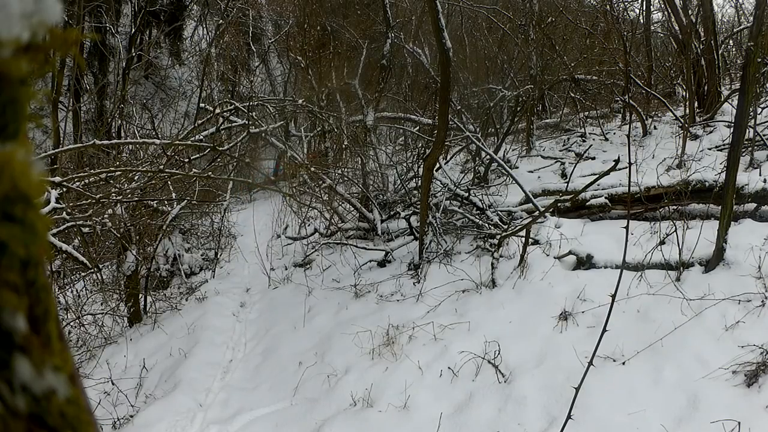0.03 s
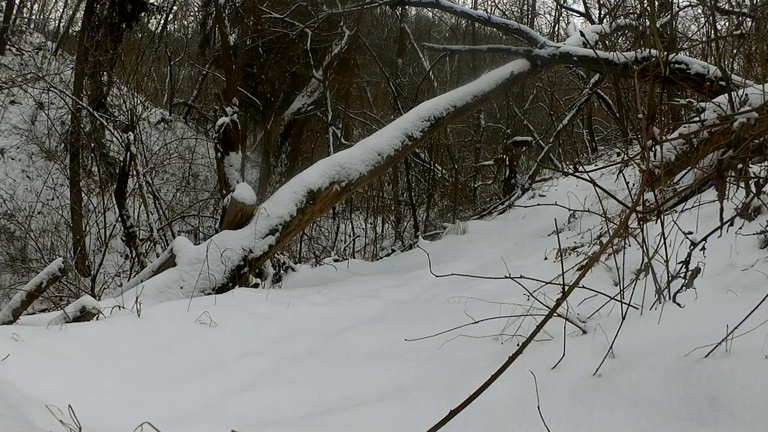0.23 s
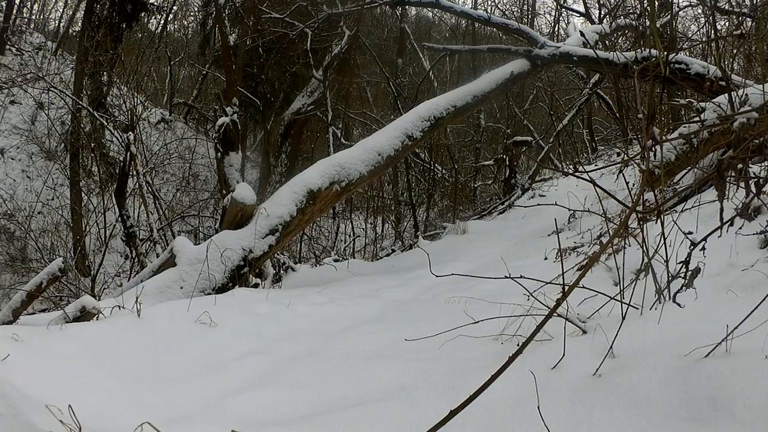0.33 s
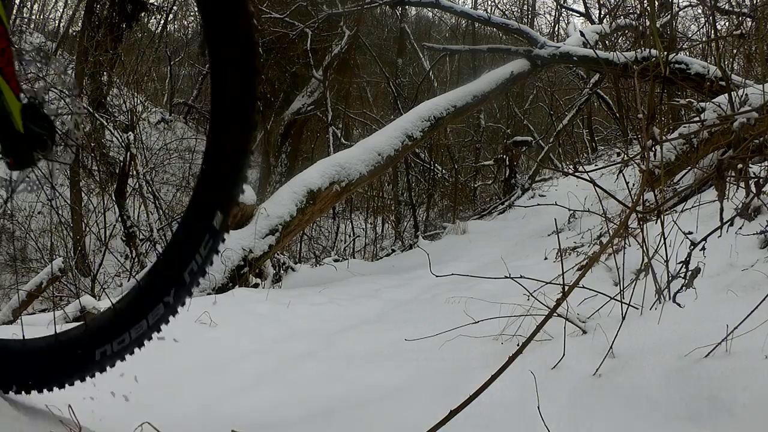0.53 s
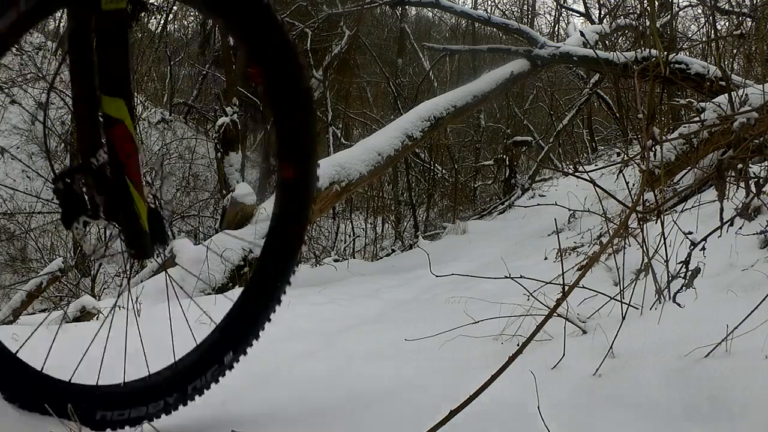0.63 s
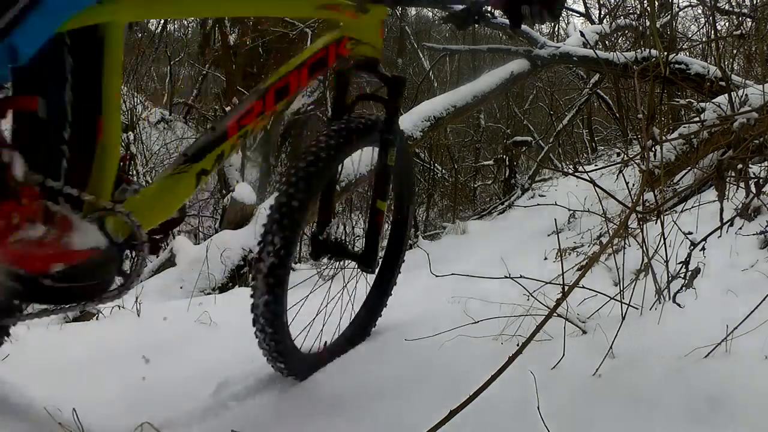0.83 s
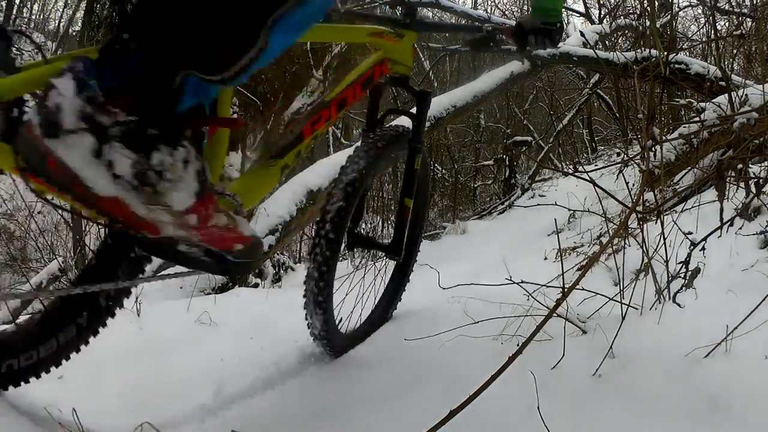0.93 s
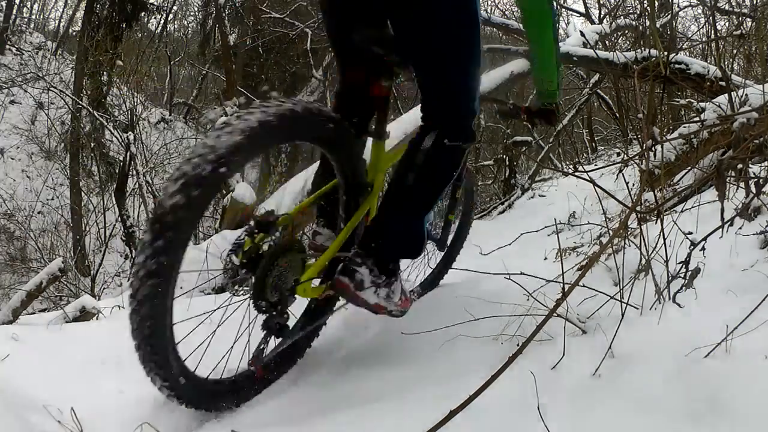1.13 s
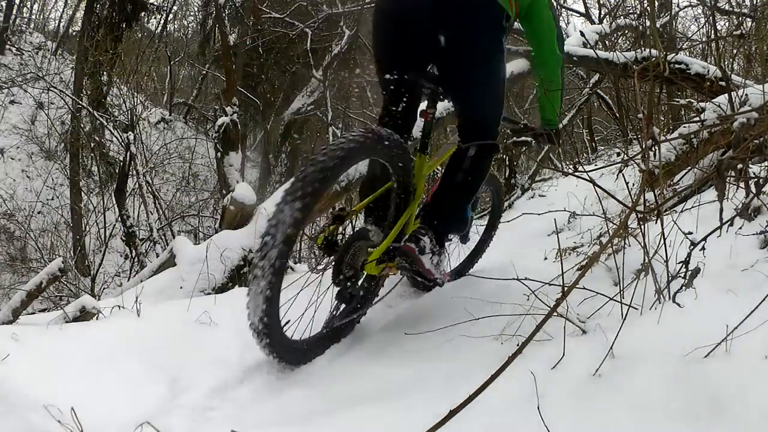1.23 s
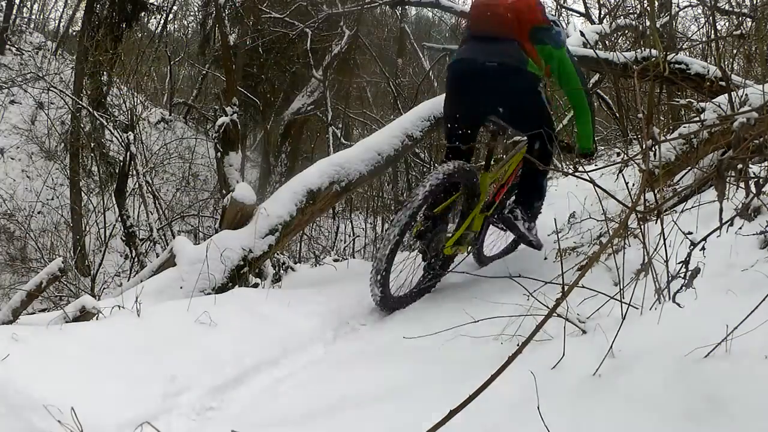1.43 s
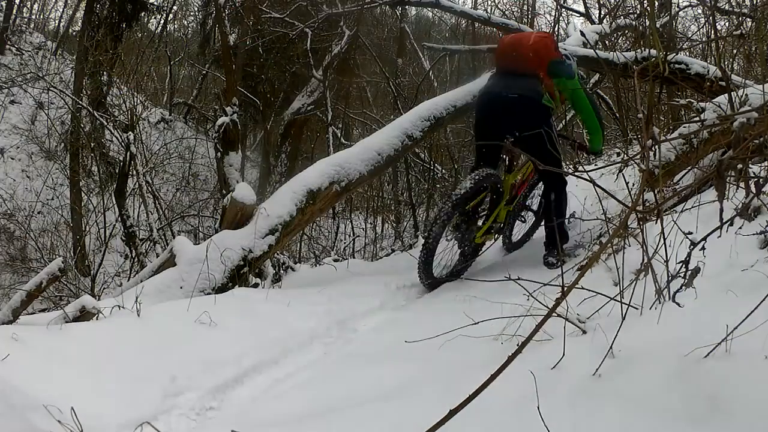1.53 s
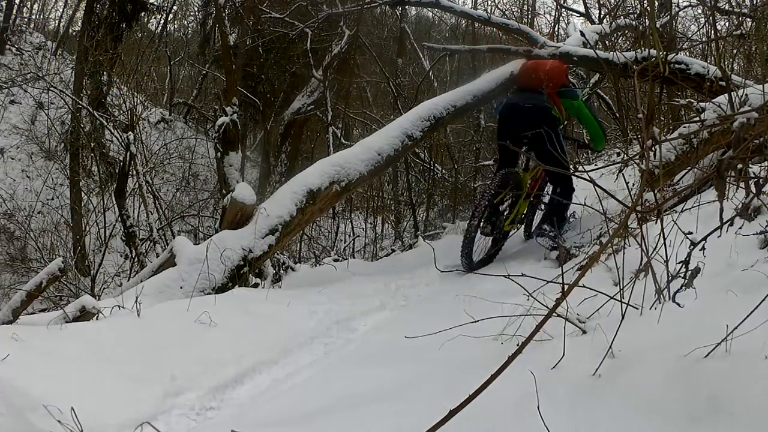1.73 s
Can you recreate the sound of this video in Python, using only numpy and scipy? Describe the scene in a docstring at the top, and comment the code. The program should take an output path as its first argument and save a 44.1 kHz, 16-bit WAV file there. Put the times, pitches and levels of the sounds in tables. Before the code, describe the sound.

Bicycle tyres crunch through snow, passing close by and fading as the bike rolls away.

```python
"""Mountain bike in snow

A bike rolls close by on a forest trail and rides away. Its tyres crush the snow by brittle fracture
in dense grains, pack it with a low grumble and throw up a fine spray. Crust snaps, the wheels thud,
and each wheel in turn rasps by stick-slip friction over something hard, modelled as a buried stick."""
import sys
import numpy as np
from scipy import signal
from scipy.fft import rfft, irfft, next_fast_len
from scipy.io import wavfile
from scipy.ndimage import uniform_filter1d

SR = 44100
rng = np.random.default_rng(int(sys.argv[2]) if len(sys.argv) > 2 else 0)


def master(y):
    """Save y as 16-bit WAV."""
    cut = np.clip(np.atleast_2d(y).T, -1, 1)
    pcm = np.round(cut * 32767)  # scale
    wavfile.write(sys.argv[1], SR, pcm.astype(np.int16))


N = 79380

# envelopes of the snow under the tyres (time [s], level [dB])
CRUNCH_LEVEL = [(.2, -46.5), (.31, -43.5), (.35, -51), (.385, -48.5), (.432, -46), (.45, -41),
                (.478, -37.5), (.50, -49.5), (.555, -51.5), (.59, -46.5), (.653, -45), (.66, -34),
                (.70, -38), (.74, -38.5), (.79, -42), (.858, -37), (.885, -47), (.945, -50), (.99, -51.5),
                (1.02, -46.5), (1.064, -49.5), (1.08, -36), (1.112, -47), (1.124, -40), (1.165, -41),
                (1.275, -51), (1.335, -46), (1.38, -54), (1.42, -49.5), (1.49, -46), (1.522, -43.5),
                (1.56, -55.5), (1.67, -64.5), (1.70, -61), (1.8, -62)]
PACKING_LEVEL = [(.2, -47.5), (.25, -56.5), (.37, -56), (.44, -52), (.49, -48), (.555, -63), (.595, -51),
                 (.645, -52.5), (.69, -46), (.76, -41), (.80, -47), (.865, -46), (.94, -58.5),
                 (1.06, -55.5), (1.088, -52), (1.15, -50), (1.22, -50.5), (1.275, -56.5), (1.34, -56),
                 (1.52, -57.5), (1.58, -66.5), (1.8, -70)]
SPRAY_LEVEL = [(0.21, -72), (0.372, -74), (0.474, -60), (0.508, -76), (0.654, -72), (0.666, -58.5),
               (0.688, -63), (0.87, -59), (0.9, -62.5), (1.12, -65), (1.15, -53), (1.178, -63.5),
               (1.33, -64), (1.48, -72), (1.508, -54), (1.56, -70), (1.74, -80.5), (1.78, -63), (1.79, -72)]
# direction of the bike (time [s], left minus right [dB], right lag [samples])
DIRECTION = [(.2, 5, 2.3), (.65, 4, 1.5), (.95, 1.5, 1.35), (1.25, -2, -0.74), (1.8, -3.5, -4)]
# collapses of deeper snow (start [s], length [s], level [dB])
COLLAPSES = [(0.421, 0.078, -42), (0.693, 0.031, -44), (0.82, 0.062, -42.5), (1.007, .028, -51.5),
             (1.069, 0.03, -45), (1.13, 0.21, -57.5), (1.303, 0.073, -56), (1.42, 0.15, -49.5),
             (1.679, 0.019, -59)]
# wheels on the stick (start [s], rise [s], hold [s], level [dB], cracking relative to ring [dB])
STICK_RASPS = [(0.667, 0.0088, 0.0084, -24.5, -4), (0.6876, 0.0019, 0.002, -27, -2),
               (1.067, 0.0027, 0.0092, -34.5, 6)]
# modes of the stick (frequency [Hz], level [dB], time to fall 60 dB [s])
STICK_MODES = [(1664, -1.5, 0.17), (1866, -7, 0.083), (2188, 3, 0.054), (2670, -8.5, 0.042),
               (3300, -10, 0.056), (3520, -6, 0.098), (4649, -26, 0.091)]
# snapping crust (time [s], level [dB], crumbling decay [s], pitch of the piece [Hz])
CRUST_SNAPS = [(.2153, -42.5, 0.0016, 2490), (.2455, -42, 0.0023, 2750), (.300, -41.5, 0.0019, 2380),
               (.326, -37.5, 0.0023, 2550), (.3985, -37.5, 0.00082, 2200), (.4468, -34, 0.002, 2700),
               (.4555, -32, 0.0015, 1620), (.4817, -37.5, 0.00056, 1840), (.6272, -39, 0.00043, 2760),
               (.716, -37, .0014, 2600), (.9015, -39, 0.0008, 1250), (.913, -48.5, 0.00075, 1230),
               (.926, -49, .0015, 3140), (.9405, -47.5, 0.0011, 3540), (.956, -64, .001, 3220),
               (.971, -52.5, .002, 2580), (1.122, -39.5, .0035, 2550), (1.137, -45, .0016, 2280),
               (1.528, -45, 0.00095, 1800), (1.6433, -50, 0.0033, 1770)]
# thin bright ticks; the first is a click as the sound starts abruptly (time [s], level [dB], decay [s])
BRIGHT_TICKS = [(.2015, -53.5, 0.00054), (.3985, -51.5, 0.0011), (.970, -56, 0.00073), (1.431, -58, 0.003),
                (1.6433, -57, 0.0056)]
# wheel drops (time [s], level [dB])
WHEEL_DROPS = [(0.76, -31.5), (1.074, -38.5), (1.0845, -37.5), (1.0916, -35), (1.119, -37.5)]
# spectral shapes of the sources (frequency [Hz], relative level [dB])
CRUNCH_SPECTRUM = [(30, -46), (150, -33.5), (400, -18), (650, -19), (1000, -12.5), (1450, -11), (2000, -8),
                   (2750, 0), (3100, -8.5), (3700, -15), (4400, -25), (5500, -45), (8000, -43),
                   (13000, -101)]
PACKING_SPECTRUM = [(25, -78), (60, -30), (100, -13), (170, 2.5), (300, 0), (450, -2), (650, -3),
                    (1100, -12.5), (2500, -66.5), (12000, -64.5)]
SPRAY_SPECTRUM = [(300, -53), (2500, -27.5), (3700, 3.5), (4600, 3.5), (6000, -12), (7400, 0), (8000, -5),
                  (8900, 2), (10000, -7), (11300, -20), (12500, -64)]
COLLAPSE_SPECTRUM = [(60, -21), (300, -25.5), (600, -2.5), (1000, 4), (1400, 3), (2000, -0.5), (3000, -1),
                     (6000, -43), (12000, -85)]
SLIP_SPECTRUM = [(40, -72), (300, -23), (1250, -27), (1750, 9.5), (2300, -6.5), (3700, 2), (4400, -18),
                 (6000, -35), (12500, -55)]
SNAP_SPECTRUM = [(60, -25), (250, 10), (1400, -4.5), (2700, 10), (3700, 6.5), (4600, -22), (6000, -36),
                 (12500, -42)]
TICK_SPECTRUM = [(300, -17), (1500, 17), (3200, 12.5), (4700, 7.5), (6000, -4.5), (9000, -1), (12500, -19)]
THUD_SPECTRUM = [(25, -35), (70, -23.5), (130, -2), (220, 7.5), (340, -3), (600, -8), (1200, -25),
                 (3000, -44), (12000, -93)]
FOREST_SPECTRUM = [(25, -38), (60, -17.5), (140, -2), (350, -1), (600, -1), (1400, -3), (1800, -6.5),
                   (2650, 4), (3300, -4.5), (4600, -19), (6000, -24), (7500, -20.5), (9000, -20.5),
                   (11500, -25.5), (13000, -58)]
# sensitivity of the two microphone ports (frequency [Hz], left minus right [dB])
PORT_BALANCE = [(60, 4), (250, 7.5), (600, 8), (1200, 11), (2000, 16), (2700, 25), (3300, 11.5),
                (4000, 0.5), (4700, -7.5), (6000, 7.5), (9000, 5), (12000, 0)]

TIME = np.arange(N) / SR


def tyres(onset_s=.201, knob_hz=70, knob_db=1.93):
    """Amplitude modulation: tread knobs pulse the crunch and the packing, but not the spray."""
    speed = 1 + 0.2884 * unit_rms(uniform_filter1d(rng.standard_normal(N), size=900))
    tread = undb(knob_db * np.sin(2 * np.pi * np.cumsum(knob_hz * speed) / SR))
    crunch = grains(per_s=5500, spread_db=2.5) * tread
    crunch = shaped(crunch, CRUNCH_SPECTRUM) * undb(curve(CRUNCH_LEVEL))
    packing = grains(per_s=1400, spread_db=4, scatter=0.44) * tread
    packing = shaped(packing, PACKING_SPECTRUM) * undb(curve(PACKING_LEVEL))
    spray = shaped(grains(per_s=2500, spread_db=3), SPRAY_SPECTRUM) * undb(curve(SPRAY_LEVEL))
    return (TIME > onset_s) * (pan(crunch, curve(DIRECTION)) + packing + spray)


def grains(per_s, spread_db, scatter=0.96):
    """Shot noise: random fractures, many small and few large, each from its own direction."""
    count = int(per_s * N / SR)
    when, rarity = rng.random((16000, 3))[:count, :2].T
    polarity, lag_jitter, imbalance = rng.standard_normal((16000, 3))[:count].T
    at = (when * (N - 1)).astype(int)
    size = np.sign(polarity) * undb(-spread_db * np.log(0.011 + rarity))
    lag = np.round(curve(DIRECTION, column=2)[at] + 1.1 * lag_jitter).astype(int)
    left = np.bincount(at, size, N)
    right = np.bincount(np.clip(at + lag, 0, N - 1), size * (1 + scatter * imbalance), N)
    return np.array([left, right]) / running_rms(left, samples=1100)


def collapses():
    """Compressive failure: deeper snow gives way in short, fuller bursts of grains."""
    swell = sum(undb(db) * np.sqrt(np.sin(np.pi * np.clip((TIME - start) / length, 0, 1)))
                for start, length, db in COLLAPSES)
    return shaped(grains(per_s=3200, spread_db=4), COLLAPSE_SPECTRUM) * swell


def rasps(slip_hz=618.7, spread_db=1.5, damping_s=0.0021):
    """Stick-slip friction: uneven slips of rubber crack and ring the stick; the tyre then damps it."""
    age = TIME[:SR // 8]
    modes = sum(undb(db - 60 * age / t60) * np.sin(2 * np.pi * hz * age) for hz, db, t60 in STICK_MODES)
    modes = signal.sosfilt(signal.butter(2, [600, 5000], "band", fs=SR, output="sos"), modes)
    out = np.zeros(N)
    for start, rise, hold, db, crack_db in STICK_RASPS:
        gap, strength = rng.random((80, 2)).T
        slip_times = start + (np.cumsum(0.5 + gap) - 2) / slip_hz
        slips = np.bincount((slip_times * SR).astype(int), undb(-spread_db * np.log(1 - strength)), N)
        ring = fixed_energy(signal.fftconvolve(slips, modes)[:N])
        rasp = ring + undb(crack_db) * fixed_energy(colour(slips, SLIP_SPECTRUM))
        rasp /= running_rms(rasp, samples=140)
        grip = np.clip((TIME - start) / rise, 0, 1)
        damping = np.exp(-np.maximum(TIME - start - rise - hold, 0) / damping_s)
        out += undb(db) * rasp * grip * damping
    return out


def clicks(events, spectrum):
    """Impulse response: sharp snaps or thin bright ticks with a brief noisy tail; pitched ones ring."""
    out = np.zeros(N)
    age = TIME[:1024]
    body = colour(signal.unit_impulse(N), spectrum)[:len(age)]
    for start, db, decay, *pitch in events:
        tail = rng.standard_normal(len(age)) * np.exp(-age / decay)
        excitation = signal.unit_impulse(len(age)) + tail / np.linalg.norm(tail)
        response = signal.lfilter(*signal.iirpeak(pitch[0], Q=5, fs=SR), body) if pitch else body
        click = fixed_energy(signal.fftconvolve(excitation, response))
        at = int(start * SR)
        out[at:at + len(click)] += undb(db) * click[:N - at]
    return out


def thuds():
    """Impact: a wheel drops as the snow gives way, making one dull push."""
    pushes = np.zeros(N)
    for start, db in WHEEL_DROPS:
        pushes[int(start * SR)] += undb(db)
    response = fixed_energy(colour(signal.unit_impulse(N), THUD_SPECTRUM))
    return signal.fftconvolve(pushes, response)[:N]


def trees(sound, level_db=-24, t60_s=0.12):
    """Reverberation: trees scatter the sound into a short, exponentially decaying tail."""
    age = TIME[:N // 4]
    tail = rng.standard_normal((2, len(age))) * undb(-60 * age / t60_s)
    tail /= np.linalg.norm(tail, axis=1, keepdims=True)
    return undb(level_db) * signal.fftconvolve(sound, tail, axes=1)[:, :N]


def forest():
    """Partial coherence: quiet forest and faint far tyre noise, partly alike in both ports."""
    noise = rng.standard_normal(N) + 0.81 * rng.standard_normal((2, N))
    return pan(shaped(noise, FOREST_SPECTRUM) * undb(-71.5), -5.5)


def undb(db):
    """Amplitude ratio of a level in decibels."""
    return 10 ** (np.asarray(db) / 20)


def curve(rows, column=1):
    """Linear interpolation of a table column in time."""
    rows = np.array(rows)
    return np.interp(TIME, rows[:, 0], rows[:, column])


def colour(x, spectrum):
    """Minimum-phase filtering through (frequency [Hz], gain [dB]) points."""
    size = next_fast_len(2 * N)
    size += size % 2
    hz, db = np.array(spectrum).T
    bin_hz = np.maximum(np.arange(size // 2 + 1) * SR / size, 1)
    gain = undb(np.interp(np.log(bin_hz), np.log(hz), db))
    cepstrum = irfft(np.log(gain))
    cepstrum[1:size // 2] *= 2  # folding onto positive time makes the filter causal
    cepstrum[size // 2 + 1:] = 0
    return irfft(rfft(x, size) * np.exp(rfft(cepstrum)))[..., :N]


def shaped(x, spectrum):
    """Spectral shaping at rms 1."""
    return unit_rms(colour(x, spectrum))


def unit_rms(x):
    """Power normalisation to rms 1."""
    return x / np.sqrt(np.mean(x ** 2))


def running_rms(x, samples):
    """Envelope from a moving average of power."""
    return np.sqrt(np.abs(uniform_filter1d(x ** 2, size=samples)) + 1e-6)


def fixed_energy(x):
    """Energy normalisation to that of 5 ms at rms 1."""
    return x / np.sqrt(np.sum(x ** 2) / (.005 * SR) + 1e-18)


def pan(x, db):
    """Level difference: positive db lowers the right channel, negative raises it."""
    return np.array([x[0], x[1] * undb(-db)])


def scene():
    """Superposition of the bike, its reverberation and the forest."""
    transients = clicks(CRUST_SNAPS, SNAP_SPECTRUM) + clicks(BRIGHT_TICKS, TICK_SPECTRUM) + rasps()
    bike = tyres() + collapses() + pan([transients, transients], curve(DIRECTION)) + thuds()
    return bike + trees(bike) + forest()


def record(dry, cutoff_hz=11900):
    """Frequency response: the left port is mostly louder, above all near 2.7 kHz; the top is cut."""
    hz, balance_db = np.array(PORT_BALANCE).T
    right_db = 20 * np.log10(2 / (1 + undb(balance_db)))  # the two gains average to 1
    left = colour(dry[0], np.c_[hz, right_db + balance_db])
    right = colour(dry[1], np.c_[hz, right_db])
    lowpass = signal.ellip(8, .2, 70, cutoff_hz, fs=SR, output="sos")
    return signal.sosfilt(lowpass, [left, right])


dry = scene()
out = record(dry)
master(out)
```